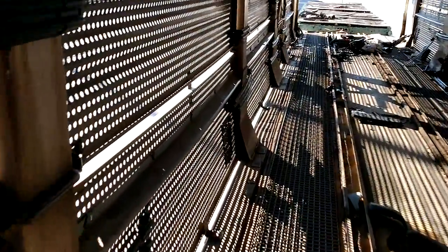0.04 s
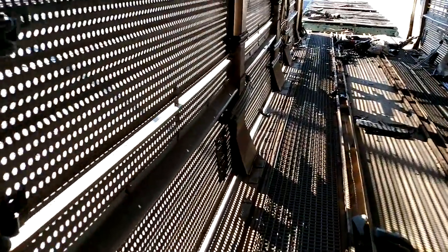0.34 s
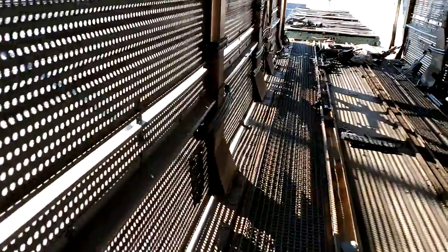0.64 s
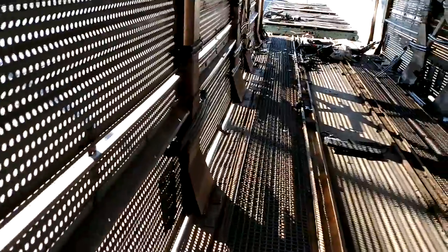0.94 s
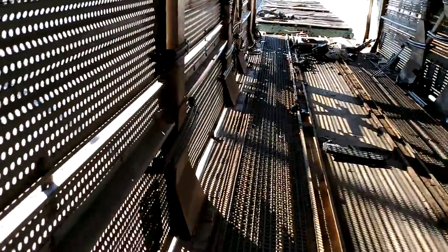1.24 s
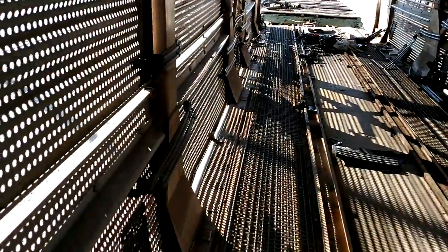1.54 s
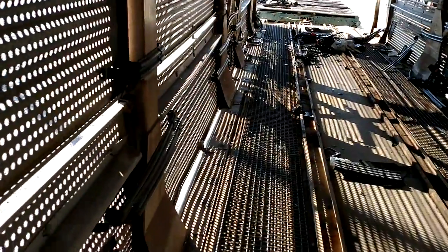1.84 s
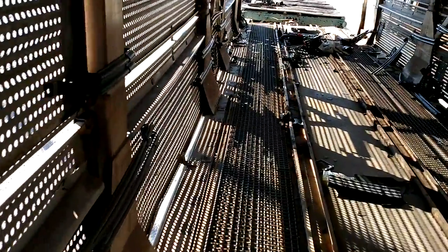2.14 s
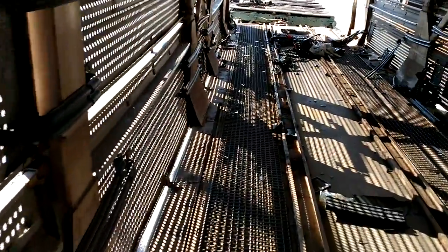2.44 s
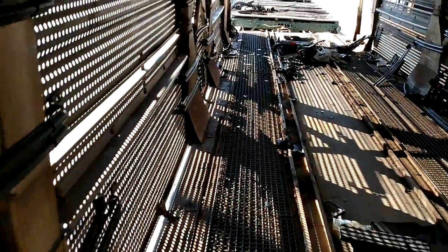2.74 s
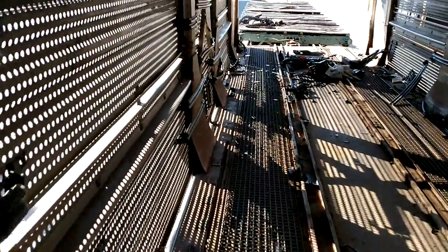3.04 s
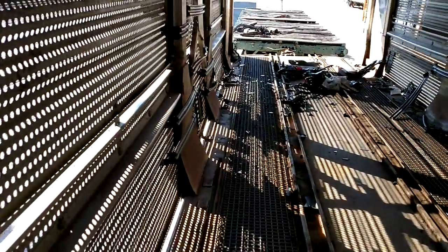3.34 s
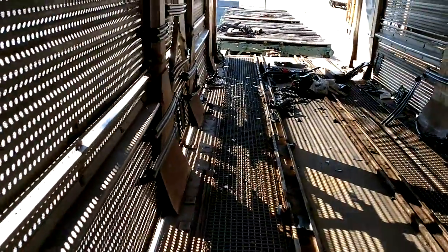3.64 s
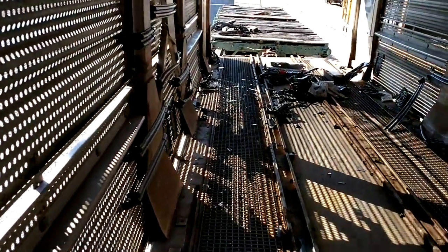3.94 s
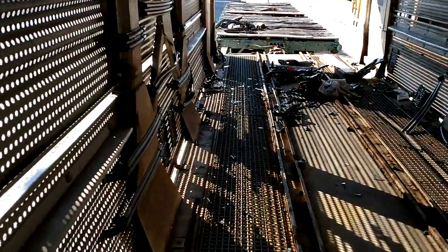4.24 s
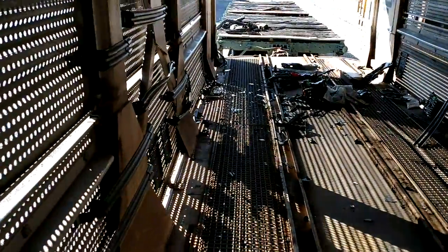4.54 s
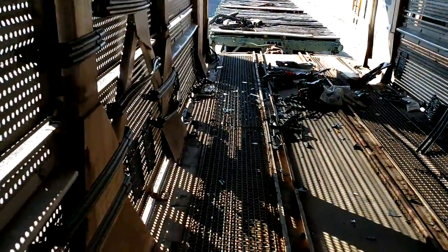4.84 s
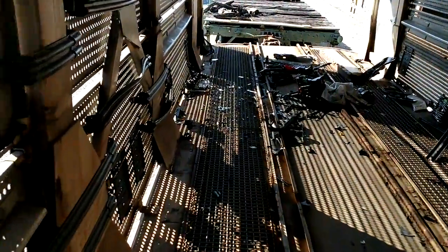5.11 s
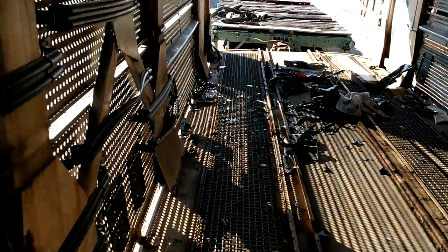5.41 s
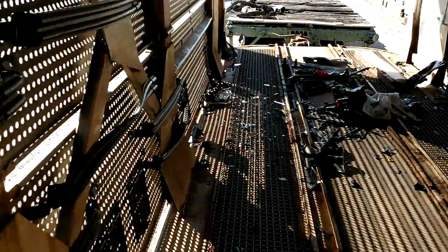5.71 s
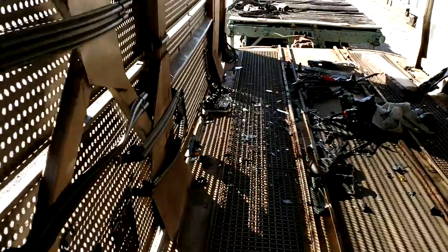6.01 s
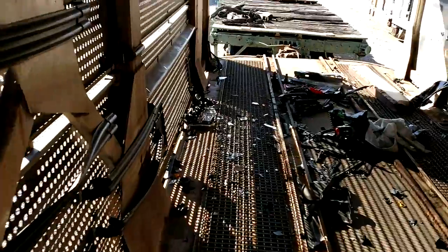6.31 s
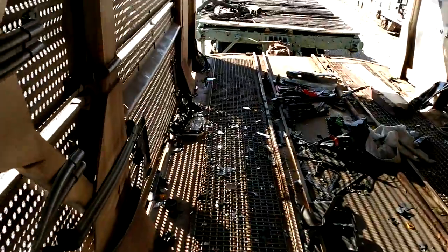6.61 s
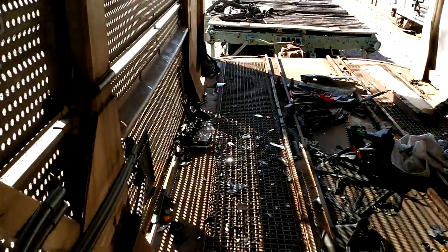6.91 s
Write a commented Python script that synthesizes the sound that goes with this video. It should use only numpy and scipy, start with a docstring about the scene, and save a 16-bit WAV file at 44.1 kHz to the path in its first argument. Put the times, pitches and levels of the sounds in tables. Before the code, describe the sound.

Slow, uneven footsteps cross a steel grating floor inside a long rail car, heard close from the walker's position. A faint low rumble from the yard outside runs throughout. A step with a dry tap and a metal snap lands right at the start, followed by light knocks and scuffs. Further steps clank at about 1.4 and 2 seconds, the second with a bright jingle of loose bars. After softer scuffs, a heavier step comes at 3.5 seconds, then panel edges snap twice just before 4 seconds. Small knocks and scrapes fill the next stretch. From 5.6 seconds the steps come closer together, rattling and jingling, with the loudest sharp clacks at about 5.8 and 6.4 seconds. A last step lands at 7 seconds. The thuds ring on for about a second in the car, while the bright rattles fade sooner.

```python
"""Footsteps on steel grating.

Slow, uneven steps in a long rail car, heard from the walker's position. Each heel, sole and scuff
sets the panels chattering; the thud rings on in the car, the bright jingle of loose bars dies sooner.
Panel edges snap and a few dry taps sound close by, over the low rumble of the yard outside."""
import sys
import numpy as np
from scipy import signal
from scipy.fft import rfft, irfft, next_fast_len
from scipy.io import wavfile
from scipy.ndimage import uniform_filter1d, map_coordinates

SR = 44100
rng = np.random.default_rng(int(sys.argv[2]) if len(sys.argv) > 2 else 0)


def wav_record(signal):
    """Record a signal, one row per channel, as 16-bit PCM in the file named by sys.argv[1]."""
    frames = np.transpose(np.atleast_2d(signal))
    bounded = np.clip(frames, -1, 1)
    # unit amplitude maps onto the largest positive 16-bit level
    quanta = np.round(bounded * 32767).astype(np.int16)
    wavfile.write(sys.argv[1], SR, quanta)


N = 315755

# Yard spectrum: freq_hz, density_db
YARD_SPECTRUM = [(22, -40), (38, -22), (50, 0.5), (65, -5), (92, 1), (160, -4.5), (300, -4), (500, -11),
                 (1000, -13), (2000, -20.5), (4000, -26.5), (7000, -22), (10000, -24.5), (15000, -33)]
# Yard loudness: time_s, level_db
YARD_ENVELOPE = [(0, -46.5), (1.8, -47), (3.3, -49), (4.5, -43.5), (5.4, -50), (7.16, -47)]
# Sliding soles: start_s, clank_db, brightness_db, decay_s
SOLE_SCUFFS = [(0, -43, -3, 0.0044), (.307, -47, 3.5, 0.035), (.62, -41, -7, .16),
               (2.392, -44, -2.5, 0.037), (2.773, -37, -6, 0.046), (4.195, -44, 0, 0.022),
               (4.835, -42, 1, .046), (5.058, -36, -6, 0.017), (5.569, -32.5, -5, 0.091),
               (6.279, -33, -1, 0.03), (6.92, -45, 8, 0.056)]
# Knocks of a toe or rocking panel: start_s, clank_db, brightness_db
TOE_KNOCKS = [(.081, -40.5, 4.5), (0.499, -42, 0.5), (0.522, -35, -4), (.811, -40.5, -9),
              (1.026, -48.5, -0.5), (1.098, -38, -6), (1.16, -40.5, -0.5), (2.185, -41, 4),
              (2.636, -48.5, -1.5), (2.878, -43.5, 2), (3.405, -38.5, -1.5), (3.595, -43, -10),
              (3.897, -32.5, 1.5), (4.472, -37, -8), (4.939, -37.5, -2), (5.271, -45.5, -5),
              (5.406, -46, -2.5), (5.488, -39.5, -5), (5.788, -30.5, 3.5), (6.153, -46, 7), (6.221, -44, 9),
              (6.419, -25.5, -4), (6.805, -41, 0.5)]
# Footfalls: start_s, heel_clank_db, thud_over_clank_db, brightness_db, heel_to_sole_s, sole_over_heel_db
FOOTFALLS = [(.136, -28.5, -6, -4.5, 0.036, -19), (1.354, -30, -13.5, -4, 0.059, -1.5),
             (1.995, -30, -6.5, -4, 0.098, 3.5), (3.501, -22, -8.5, -2, 0.054, -4),
             (5.646, -24, -21, -2, 0.11, -8), (5.916, -28.5, -4.5, 3, 0.072, -25),
             (6.344, -29, -10, 2.5, 0.013, -0.5), (7.043, -25.5, -15, 1, .03, -7)]
# Floor bands (thud, clank, rasp, ring, sizzle): centre_hz, t60_s
FLOOR_BANDS = [(230, 1), (900, 0.66), (3500, 0.47), (7100, 0.38), (11000, 0.4)]
# Contact drive per floor band: over_clank_db, thud_weight, brightness_weight
BAND_DRIVE = [(0, 0.98, 0), (0, 0, 0), (-1, 0, 0.7), (0.5, 0.044, 1.15), (-2, 0.037, 1.27)]
# Struck grating spectrum: freq_hz, density_db
GRATING_SPECTRUM = [(45, -32), (130, -14), (230, -2.5), (450, -3.5), (720, -1), (1750, -4), (2400, -8.5),
                    (3900, -11.5), (6200, -4.5), (7200, -1.5), (8400, -10.5), (10100, -2.5), (12700, -20),
                    (15500, -18.5)]
# Panel and bar modes: centre_hz, width_hz, strength_db
BAR_MODES = [(238, 2.3, -7), (353, 6.3, -3), (672, 25, -11.5), (984, 12, -9), (3550, 4.7, -55),
             (4950, 29, 2), (6780, 19, -2), (7200, 25, -1), (9340, 140, 1.5), (9874, 50, -5),
             (10260, 12, -6), (10570, 15, -5)]
# Close taps: start_s, peak_db, pitch_hz, t60_s
DRY_TAPS = [(.1362, -17, 724, 0.004), (0.8123, -32, 990, 0.0088), (5.158, -20.5, 774, 0.0073),
            (5.7863, -10.5, 900, 0.0085), (6.421, -8, 1160, 0.0034)]
# Steel-on-steel snaps: start_s, level_db
EDGE_SNAPS = [(0.139, -20.5), (1.998, -25), (3.683, -34), (3.721, -20.5), (3.898, -17), (5.651, -31),
              (5.791, -10.5), (6.4234, -12.5)]
# Loose bars: start_s, level_db, centre_hz
BAR_JINGLES = [(1.452, -37, 10600), (1.82, -46.5, 10600), (1.995, -25, 7760), (2.187, -35, 7500),
               (3.68, -37, 10500), (3.721, -34, 9200), (3.897, -25.5, 9400), (4.438, -45.5, 8400),
               (4.708, -41.5, 8850), (5.648, -21, 8140), (5.728, -25.5, 8500), (6.661, -44, 8100),
               (6.972, -42, 9500)]
# Microphone pair phase: freq_hz, right_lead_half_turns
MIC_PHASE = [(60, 0), (300, 0.22), (700, 0.02), (1150, 0), (2220, -1), (3270, 0), (4350, 1), (5430, 2),
             (6480, 3), (7400, 4), (8600, 4.5)]
# Microphone pair likeness: freq_hz, base_coherence
MIC_COHERENCE = [(60, 0.79), (350, 0.77), (1100, 1), (2200, .999), (4400, .999), (6500, 0.95), (7500, 0.93),
                 (8800, 0.057), (15000, 0.076)]
# Microphone pair balance: freq_hz, left_over_right_db
MIC_BALANCE = [(30, 18), (70, -6.5), (250, -1.5), (600, 0), (2200, 0), (4400, -1), (5500, -0.5),
               (8300, -2.5), (9900, 9.5), (11500, 11.5), (13000, -6.5), (15500, 17)]

LOW_CUT_HZ, TOP_HZ = 40, 15850


def amp(db):
    """Decibels to gain."""
    return 10 ** (np.asarray(db) / 20)


def unit_rms(x):
    """Scale to rms 1."""
    return x / np.sqrt(np.mean(x ** 2) + 1e-20)


def log_interp(points, hz):
    """Read (freq_hz, value) points on a log axis."""
    freqs_hz, values = np.transpose(points)
    return np.interp(np.log(hz + 1), np.log(freqs_hz + 1), values)


def wobble(knots_per_s):
    """Smooth random curve."""
    knots = rng.standard_normal(int(N * knots_per_s / SR) + 4)
    return map_coordinates(knots, [np.arange(N) * knots_per_s / SR])


def filtered(x, response):
    """Apply a complex frequency response."""
    size = next_fast_len(N + SR // 2)
    return irfft(rfft(x, size) * response(np.fft.rfftfreq(size, 1 / SR)), size)[..., :N]


def add(track, start_s, sound):
    """Mix a sound into a track."""
    start = max(round(start_s * SR), 0)
    span = track[..., start:start + sound.shape[-1]]
    span += sound[..., :span.shape[-1]]


def yard(sway_db=1.0, sway_per_s=4.4):
    """Distant rumble and air, swaying slightly."""
    air = unit_rms(filtered(rng.standard_normal((2, N)), lambda hz: amp(log_interp(YARD_SPECTRUM, hz))))
    level_db = np.interp(np.arange(N) / SR, *np.transpose(YARD_ENVELOPE))
    return air * amp(level_db + sway_db * wobble(sway_per_s))


def shoe_contacts(heel_decay_s=0.0087, sole_decay_s=0.015, knock_decay_s=0.0041,
                  sole_thud_db=3, sole_bright_db=0.5, knock_thud_db=-15.5, scuff_thud_db=-2.5):
    """Heels, soles, knocks and scuffs: start_s, clank_db, thud_db, bright_db, decay_s."""
    for start_s, clank_db, thud_db, bright_db, roll_s, sole_db in FOOTFALLS:
        yield start_s, clank_db, thud_db, bright_db, heel_decay_s
        yield (start_s + roll_s, clank_db + sole_db, thud_db + sole_thud_db,
               bright_db + sole_bright_db, sole_decay_s)
    for start_s, clank_db, bright_db in TOE_KNOCKS:
        yield start_s, clank_db, knock_thud_db, bright_db, knock_decay_s
    for start_s, clank_db, bright_db, decay_s in SOLE_SCUFFS:
        yield start_s, clank_db, scuff_thud_db, bright_db, decay_s


def chatter(decay_s, bounces_per_s=900, first_blow=0.74):
    """Energy shares of one blow and its fading random bounces on the frame."""
    t = np.arange(SR // 3) / SR
    bounces = rng.exponential(size=len(t)) * (rng.random(len(t)) < bounces_per_s / SR)
    bounces[0] = first_blow
    energy = bounces * np.exp(-t / decay_s)
    return energy / energy.sum()


def footsteps():
    """Energy per floor band from panels chattering under the shoes."""
    blows = np.zeros((len(FLOOR_BANDS), N))
    offset_db, thud_weight, bright_weight = np.transpose(BAND_DRIVE)
    for start_s, clank_db, thud_db, bright_db, decay_s in shoe_contacts():
        bands_db = clank_db + offset_db + thud_db * thud_weight + bright_db * bright_weight
        add(blows, start_s, np.outer(amp(bands_db) ** 2, chatter(decay_s)))
    return blows


def band_shares(hz):
    """Split of a frequency among the floor bands."""
    centres_hz = [centre_hz for centre_hz, _ in FLOOR_BANDS]
    return np.array([log_interp(list(zip(centres_hz, row)), hz) for row in np.eye(len(centres_hz))])


def shifting_modes(fine_db=2.5, broad_db=2.08):
    """Two noises with randomly drifting peaks, as when feet move from panel to panel."""
    spectra = signal.stft(rng.standard_normal((2, N)), nperseg=2048)[2]

    def patches(bins, frames=12):
        across_freq = uniform_filter1d(rng.standard_normal(spectra.shape[1:]), bins, axis=0)
        return unit_rms(uniform_filter1d(across_freq, frames, axis=1))
    gain = amp(fine_db * patches(bins=2) + broad_db * patches(bins=30))
    return signal.istft(spectra * gain, nperseg=2048)[1][:, :N]


def steel_modes():
    """Crowded panel modes with a few bars standing out; rms 1 per band."""
    size = next_fast_len(N)
    hz = np.fft.rfftfreq(size, 1 / SR)
    bars = 1 + sum(amp(db) / (1 + (2 * (hz - centre_hz) / width_hz) ** 2)
                   for centre_hz, width_hz, db in BAR_MODES)
    colour = amp(log_interp(GRATING_SPECTRUM, hz)) * bars
    spectra = [rfft(shifting_modes(), size) * colour * share for share in band_shares(hz)]
    return [unit_rms(irfft(spectrum, size)[:, :N]) for spectrum in spectra]


def stored_energy(blows, t60_s):
    """Each blow adds energy, which drains by 60 dB in t60_s."""
    return signal.lfilter([1], [1, -np.exp(-np.log(10 ** 6) / (t60_s * SR))], blows)


def grating(crack_db=3, crack_t60_s=0.007, echo_db=-11.0, echo_t60_ratio=1.66,
            buzz_db=0.7, buzz_per_s=110):
    """Each blow from a shoe or bar cracks, rings in the steel and echoes longer in the car."""
    buzz = wobble(buzz_per_s)  # loose bars against their frame; roughest in the highs
    bands = steel_modes()
    band_blows = footsteps() + jingles()
    floor = np.zeros((2, N))
    for (centre_hz, t60_s), modes, blows in zip(FLOOR_BANDS, bands, band_blows):
        crack = amp(crack_db) ** 2 * stored_energy(blows, crack_t60_s)
        ring = amp(buzz_db * buzz * np.sqrt(centre_hz / TOP_HZ)) ** 2 * stored_energy(blows, t60_s)
        echo = amp(echo_db) ** 2 * stored_energy(blows, t60_s * echo_t60_ratio)
        floor += modes * np.sqrt(crack + ring + echo)
    return floor


def taps(rise_s=0.0011):
    """Knocks of a few cycles, too near to raise an echo."""
    track, t = np.zeros(N), np.arange(SR // 20) / SR
    for start_s, peak_db, pitch_hz, t60_s in DRY_TAPS:
        envelope = np.exp(-np.log(1000) * t / t60_s) * (1 - np.exp(-t / rise_s))
        knock = np.sin(2 * np.pi * pitch_hz * t) * envelope
        add(track, start_s, amp(peak_db) * knock / np.abs(knock).max())
    return track


def snaps(t60_s=0.011, highpass_hz=2500):
    """A loose panel edge slaps its frame: a short burst of the bright modes."""
    blows = np.zeros(N)
    for start_s, level_db in EDGE_SNAPS:
        add(blows, start_s, amp([level_db]) ** 2)
    colour = lambda hz: amp(log_interp(GRATING_SPECTRUM, hz)) * hz ** 2 / (hz ** 2 + highpass_hz ** 2)
    bright_modes = unit_rms(filtered(rng.standard_normal((2, N)), colour))
    return bright_modes * np.sqrt(stored_energy(blows + 1e-20, t60_s))


def jingles(decay_s=0.006):
    """Energy per floor band from loose bars bouncing, pitched above the panels."""
    blows = np.zeros((len(FLOOR_BANDS), N))
    for start_s, level_db, centre_hz in BAR_JINGLES:
        add(blows, start_s, np.outer(amp(level_db) ** 2 * band_shares(centre_hz), chatter(decay_s)))
    return blows


def microphones(field, coherence_dip=0.44):
    """Two unrelated signals to left and right: in or out of phase by frequency, less alike between."""
    def phase_rad(hz):
        return np.pi * log_interp(MIC_PHASE, hz)

    def mid_side_gains(hz):
        coherence = log_interp(MIC_COHERENCE, hz) * (1 - coherence_dip * np.sin(phase_rad(hz)) ** 2)
        angle_rad = np.arccos(np.clip(coherence, 0, 1)) / 2
        return np.array([np.cos(angle_rad), np.sin(angle_rad)])

    def left_right_gains(hz):
        left = amp(log_interp(MIC_BALANCE, hz) / 2) * np.exp(-.5j * phase_rad(hz))
        pair = np.array([left, 1 / left])
        return pair / np.sqrt(np.mean(np.abs(pair) ** 2, axis=0))  # constant total power
    mid, side = filtered(field, mid_side_gains)
    return filtered(np.array([mid + side, mid - side]), left_right_gains)


def scene():
    """Floor and yard in stereo, taps centred."""
    return microphones(grating() + snaps() + yard()) + taps()


def record(dry):
    """Cut the deepest rumble and everything above TOP_HZ."""
    low_cut = signal.butter(N=4, Wn=LOW_CUT_HZ, btype="highpass", fs=SR, output="sos")
    return filtered(signal.sosfilt(low_cut, dry), lambda hz: hz < TOP_HZ)


dry = scene()
out = record(dry)
wav_record(out)
```